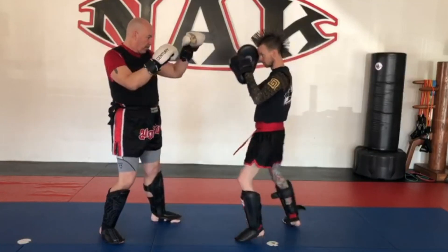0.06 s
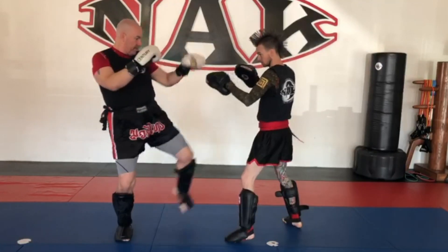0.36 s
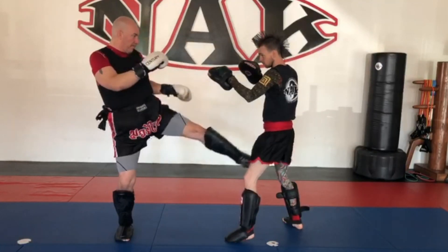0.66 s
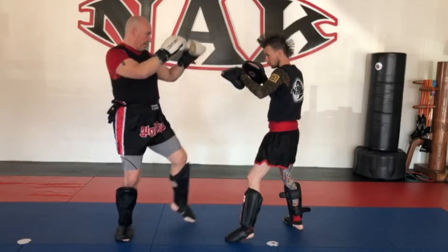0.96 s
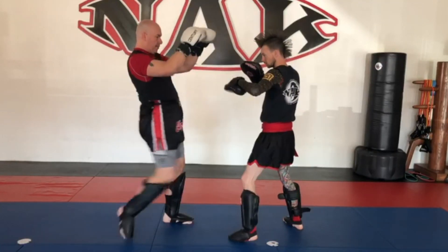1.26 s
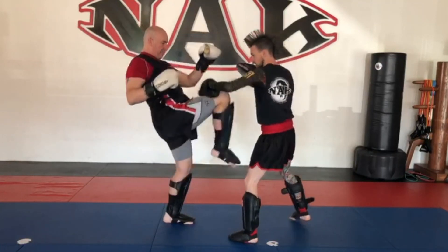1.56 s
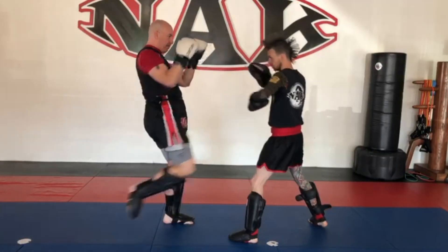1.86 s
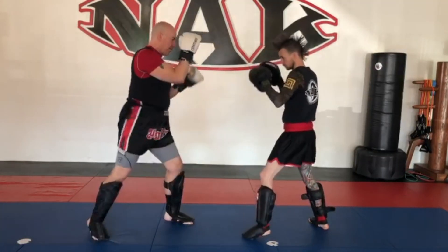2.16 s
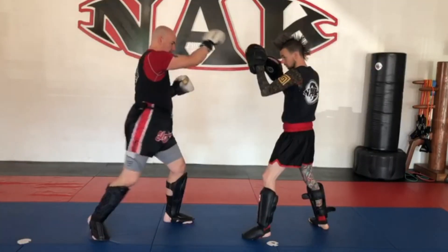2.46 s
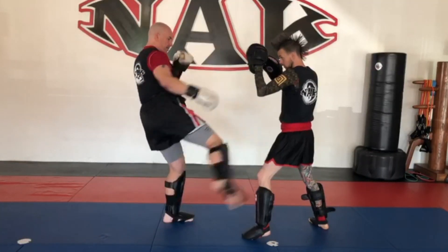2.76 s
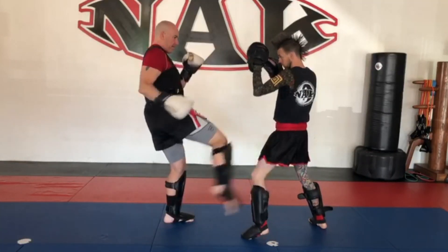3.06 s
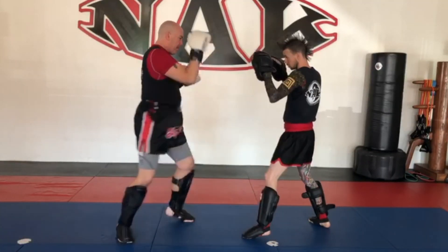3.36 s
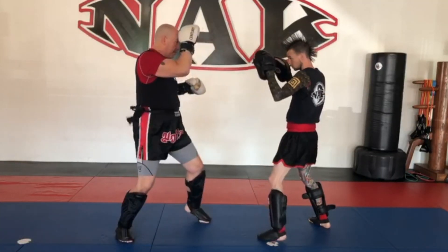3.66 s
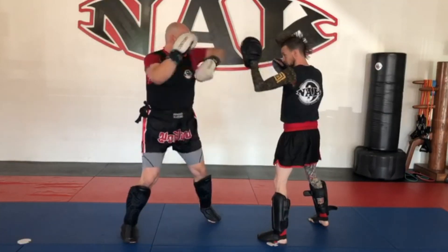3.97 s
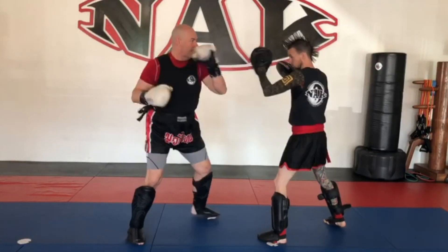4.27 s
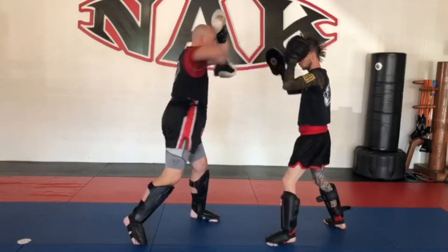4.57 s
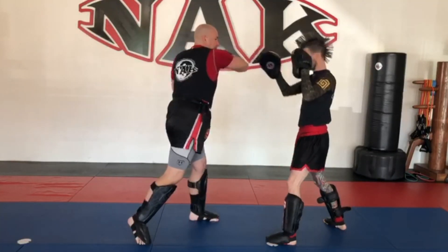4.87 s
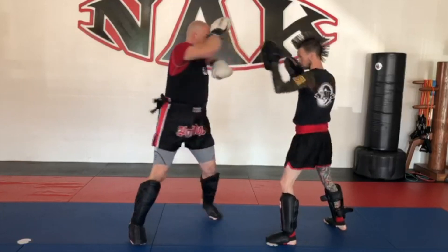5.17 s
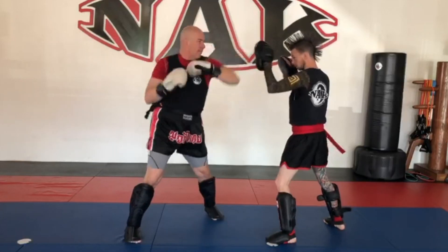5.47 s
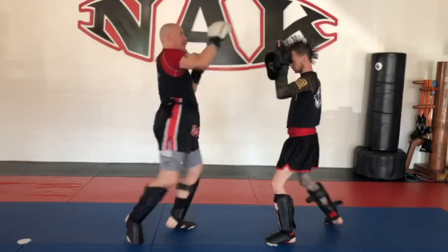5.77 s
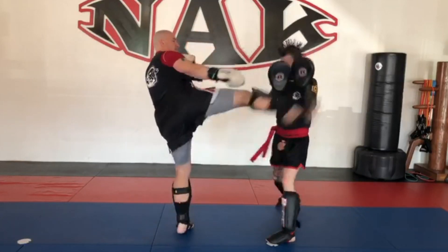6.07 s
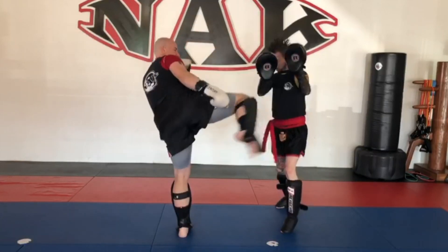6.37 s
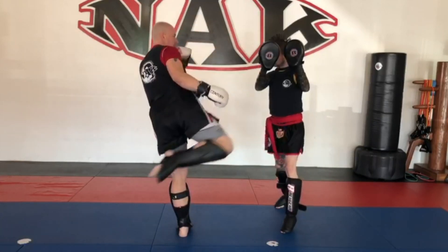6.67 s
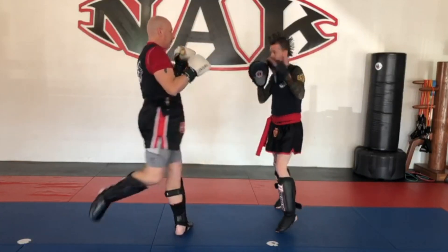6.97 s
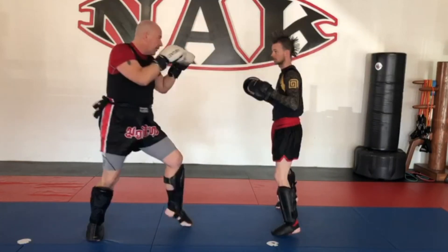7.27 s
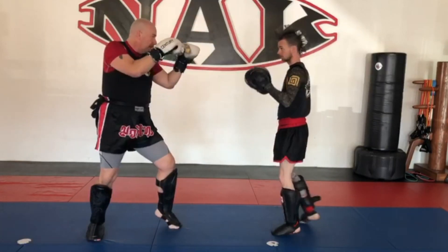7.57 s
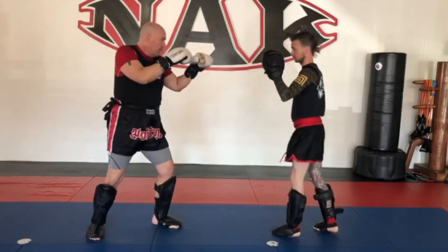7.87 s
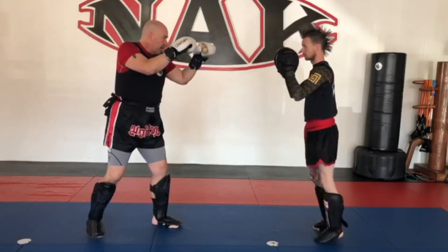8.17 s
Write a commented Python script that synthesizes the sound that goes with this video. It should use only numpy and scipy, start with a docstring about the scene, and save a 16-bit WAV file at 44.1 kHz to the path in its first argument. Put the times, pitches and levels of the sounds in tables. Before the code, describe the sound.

Two kickboxers drill a few metres away in a hard-walled gym, over a faint, steady ventilation rumble. Each blow combines a crack of the pad cover, a pop of air and a padded thud, echoing for under a second. A light, scraping kick brushes a shin guard at 0.6 seconds. A knee smacks sharply into a mitt at 1.5, and a softer kick lands at 2.9. Three closer strikes hit the mitts: a glancing slap at 4.0, a sleeve swish and hard elbow crack at 4.7, and a scraping smack at 5.3. The loudest hit, a full popping kick, comes at 6.1. Between blows, clothes rustle faintly, straps tick and soles slide on foam mats, with soft, thumping steps around 2.0, 3.3 and 7.1. Quiet foot scuffs continue until the end, just after 8 seconds.

```python
"""A hard-walled gym: two kickboxers drill on foam mats, a few metres away.
Kicks, a knee and elbows smack into mitts and shin guards: the cover cracks, trapped air pops,
the padding thuds and the hall answers. Between blows, feet land and slide, straps tick,
a sleeve swishes and clothes rustle over a low ventilation rumble."""
import sys
import numpy as np
from scipy import signal
from scipy.fft import rfft, irfft, next_fast_len
from scipy.io import wavfile

SR = 44100
rng = np.random.default_rng(int(sys.argv[2]) if len(sys.argv) > 2 else 0)


def materialize(psi):
    """Save the field psi as 16-bit PCM at rate SR to the path in sys.argv[1].

    A 1-D psi becomes a single channel; in a 2-D psi each row is a channel.
    """
    bounded = np.clip(np.atleast_2d(psi).T, -1, 1)
    quanta = np.round(bounded * 32767).astype(np.int16)
    wavfile.write(sys.argv[1], SR, quanta)


N = 362925
TIME_S = np.arange(N) / SR


def from_db(db):
    return 10 ** (np.asarray(db) / 20)


def unit_rms(x):
    return x / np.sqrt(np.mean(x ** 2) + 1e-20)


def unit_energy(x):
    return x / np.sqrt(np.sum(x ** 2, axis=-1, keepdims=True))


def burst(x, db=0):
    """Scale to the energy of 50 ms at rms level db."""
    return from_db(db) * x * np.sqrt(.05 * SR / (np.sum(x ** 2) + 1e-20))


def at_hz(table, hz):
    """Table columns, interpolated over log frequency."""
    freqs, *columns = np.transpose(table)
    return [np.interp(np.log(hz), np.log(freqs), column) for column in columns]


def butter(x, kind, hz, order=2):
    sos = signal.butter(order, np.clip(hz, 10, .45 * SR), kind, fs=SR, output="sos")
    return signal.sosfilt(sos, x + 1e-18)


def resonate(x, hz, q):
    return signal.lfilter(*signal.iirpeak(hz, q, fs=SR), x + 1e-18)


def delayed(x, delay_s):
    return np.pad(x, (round(delay_s * SR), 0))[:len(x)]


def add(track, time_s, sound):
    start = round(time_s * SR)
    track[start:start + len(sound)] += sound[:N - start]


def swell(centre_s, sigma_s):
    return np.exp(-.5 * ((TIME_S - centre_s) / sigma_s) ** 2)


def flutter(rate_hz, depth_db):
    """Randomly wandering gain."""
    return from_db(depth_db * unit_rms(butter(rng.standard_normal(N), "low", rate_hz)))


def coloured_noise(spectrum):
    size = next_fast_len(N, real=True)
    gain = from_db(at_hz(spectrum, np.fft.rfftfreq(size, 1 / SR) + 1)[0])
    return unit_rms(irfft(rfft(rng.standard_normal(size)) * gain, size)[:N])


def noise_bands(count, size):
    """Half-octave noise as (centre [Hz], width [Hz], signals); adjacent bands are independent."""
    edges_hz = 35 * 2 ** (np.arange(18) / 2)
    white = rng.standard_normal((2, count, size + SR // 8))
    for k, (low, high) in enumerate(zip(edges_hz, edges_hz[1:])):
        yield np.sqrt(low * high), high - low, butter(white[k % 2], "band", [low, high])[:, -size:]


def crackle(decay_s, grain_db):
    """Surfaces meet patch by patch: a dying burst of uneven micro-clicks."""
    t = TIME_S[:SR // 4]
    grains = rng.standard_normal(len(t))
    unevenness = from_db(grain_db * np.clip(rng.standard_normal(len(t)), -2, 2))
    return burst(grains * unevenness * np.exp(-t / decay_s))


# Ventilation spectrum: (frequency [Hz], relative density [dB])
VENTILATION_SPECTRUM = [(15, -63), (25, -22.5), (44, -5.5), (127, -10), (208, -12), (249, -12.5),
                        (291, -17), (323, -15.5), (527, -21.5), (584, -21.5), (797, -25.5), (3660, -32.5),
                        (4060, -33.5), (12000, -41), (15600, -70.5), (22000, -120)]


def ventilation(level_db=-59):
    """Moving air: a steady low rumble."""
    return from_db(level_db) * coloured_noise(VENTILATION_SPECTRUM)


# Diffuse field: (frequency [Hz], scatter [dB], tail [dB], tail T60 [s])
HALL_BANDS = [(60, -10, -8.5, 0.86), (129, 3.5, -1, 1), (253, -2.5, -2.5, .68), (490, -2, -3.5, 0.73),
              (980, -4.5, -5.5, 0.83), (2040, -5, -7.5, 0.91), (4050, -3.5, -6.5, 0.88),
              (7700, -9, -7.5, 0.53), (12000, -5, -8, 0.27)]
# Low room modes: (frequency [Hz], relative level [dB], T60 [s])
HALL_MODES = [(53.7, -6, 0.97), (78.2, -1, 0.78), (125, -10.5, 0.48)]


def hall(spots, scatter_t60_s=.13, far_wall_s=.102, far_wall_db=2.5, modes_db=-58):
    """One response per spot: near-wall scatter, a tail that swells off the far wall, low modes."""
    t = TIME_S[:SR]

    def rise(midpoint_s):
        return 1 / (1 + (midpoint_s / (t + 1e-4)) ** 6)

    scatter = unit_energy((rise(.013) + .5 * rise(.00026)) * from_db(-60 * t / scatter_t60_s))
    far_wall = from_db(far_wall_db * np.exp(-((t - far_wall_s) / .016) ** 2))
    build_up = rise(.0079)
    responses = np.zeros((spots, len(t)))
    for hz, width_hz, band in noise_bands(spots, len(t)):
        scatter_db, tail_db, t60_s = at_hz(HALL_BANDS, hz)
        tail = unit_energy(build_up * far_wall * from_db(-60 * t / t60_s))
        envelope = np.hypot(from_db(scatter_db) * scatter, from_db(tail_db) * tail)
        band_energy = np.sum(envelope ** 2) * 2 * width_hz / SR
        responses += unit_energy(band * envelope) * np.sqrt(band_energy)
    for hz, db, t60_s in HALL_MODES:
        responses += from_db(modes_db + db - 60 * t / t60_s) * build_up * np.sin(2 * np.pi * hz * t)
    return responses


# Early reflections: (delay [s], level [dB], low-pass [Hz])
REFLECTIONS = [(.0029, -5.5, 3800), (.0150, -13, 16000), (.0192, -17.5, 17000), (0.014, 2, 59),
               (.0335, -19.5, 4200)]


def reflections(direct):
    """Single bounces off mat, walls and ceiling."""
    return sum(from_db(db) * butter(delayed(direct, delay_s), "low", top_hz, order=1)
               for delay_s, db, top_hz in REFLECTIONS)


# Rustle spectrum: (frequency [Hz], relative density [dB])
CLOTH_SPECTRUM = [(150, 8), (400, 4.5), (1000, -3.5), (2500, -7), (6000, -11), (12000, -15.5)]


def clothes(rest_db=-73, follow_db=-8.5, sigma_s=.16):
    """Cloth rustles faintly throughout and swells around each step, swish and slide."""
    moves = [(time_s, scuff_db) for time_s, _, _, scuff_db, _ in STEPS_AND_SLEEVE]
    moves += [(time_s, hiss_db) for time_s, _, hiss_db, _ in SOLE_SLIDES]
    stir = np.max([from_db(db + follow_db) * swell(time_s, sigma_s) for time_s, db in moves], axis=0)
    rustle = unit_rms(butter(coloured_noise(CLOTH_SPECTRUM), "high", 130))
    return np.hypot(from_db(rest_db), stir) * rustle * flutter(rate_hz=25, depth_db=2.2)


# Sole hiss spectrum: (frequency [Hz], relative density [dB])
SOLE_SPECTRUM = [(300, -11), (1200, -4), (3000, -1.5), (5500, -3), (9000, -6), (12000, -3.5)]
# Slides and pivots: (centre time [s], sigma [s], hiss [dB], rub [dB])
SOLE_SLIDES = [ (0.0, 0.047, -58.5, -54.5), (0.133, 0.033, -72, -60.5), (0.246, 0.011, -51.5, -73),
               (1.181, .034, -57.5, -59), (2.075, 0.068, -54, -58.5), (2.549, 0.027, -68, -57),
               (3.601, 0.037, -49.5, -59.5), (4.034, 0.037, -51, -54), (5.192, 0.064, -58, -65),
               (5.827, .02, -63.5, -61), (7.004, 0.022, -58, -64.5), (7.533, 0.056, -51, -64),
               (7.948, 0.031, -65.5, -62), (8.061, 0.016, -54.5, -58.5)]


def slides():
    """Soles drag on the mat: grainy hiss over a duller rub."""
    hiss = coloured_noise(SOLE_SPECTRUM) * flutter(rate_hz=150, depth_db=2.9)
    rub = unit_rms(resonate(rng.standard_normal(N), hz=560, q=1))
    return sum(swell(time_s, sigma_s) * (from_db(hiss_db) * hiss + from_db(rub_db) * rub)
               for time_s, sigma_s, hiss_db, rub_db in SOLE_SLIDES)


# Strap and glove ticks: (time [s], level [dB])
STRAP_TICKS = [(1.131, -62.5), (1.1653, -60.5), (1.179, -64), (2.41, -64.5), (3.1433, -62)]


def straps():
    """Straps and glove leather tick in short, bright crackles."""
    track = np.zeros(N)
    for time_s, db in STRAP_TICKS:
        tick = butter(crackle(decay_s=.0015, grain_db=4), "band", [2200, 10000], order=1)
        add(track, time_s, burst(tick, db))
    return track


# Landings on the mat, plus one bright sleeve swish just before the elbow strike (4.63 s):
# (time [s], weight [dB], slap [Hz], scuff [dB], scuff decay [s])
STEPS_AND_SLEEVE = [ (0.232, -58, 895, -59.5, .005), (1.017, -56, 393, -60, 0.027),
                    (1.2863, -61, 1600, -62, 0.015), (2.0086, -42, 800, -65.5, 0.022),
                    (3.3098, -43, 840, -56, 0.018), (3.518, -57, 468, -58.5, 0.011),
                    (4.318, -58.5, 400, -54.5, 0.018), (4.4783, -67, 555, -52, .022),
                    (4.631, -51.5, 1970, -52.5, 0.039), (5.7455, -50.5, 460, -50, 0.0062),
                    (6.024, -55.5, 700, -48.5, .035), (7.0756, -40, 572, -54.5, 0.055)]


def steps_and_sleeve(heavy_hz=198, heavy_db=-42, rise_oct_per_db=.05):
    """Slap, scuff, then thump: a foot landing on foam or, with a bright slap, the sleeve swish."""
    track, click = np.zeros(N), signal.unit_impulse(SR // 4)
    for time_s, weight_db, slap_hz, scuff_db, decay_s in STEPS_AND_SLEEVE:
        slap_db = (weight_db + scuff_db) / 2 + 3
        slap = resonate(crackle(.19 * decay_s, grain_db=.99), slap_hz, q=.49)
        slap = butter(slap, "low", 3 * slap_hz)
        scuff = butter(crackle(decay_s, grain_db=12), "high", 780, order=1)
        scuff = butter(scuff, "low", 8500)
        add(track, time_s, burst(slap, slap_db) + burst(scuff, scuff_db))
        # A light step sinks less into the foam, so it thumps higher.
        thump_hz = heavy_hz * 2 ** (rise_oct_per_db * (heavy_db - weight_db))
        thump = butter(resonate(click, thump_hz, q=2), "low", 2.1 * thump_hz)
        thump = butter(thump, "high", .5 * thump_hz)
        add(track, time_s + .004, burst(thump, weight_db))
    return track


def body_thud(impact, depth_db, base_db=-23.5, db_per_depth_db=1.29):
    """The blow shoves limb and body, harder the deeper it sinks: a slow pulse of air."""
    shove = butter(resonate(impact, hz=70, q=.48), "low", 100, order=3)
    return burst(shove, base_db + db_per_depth_db * depth_db)


def padding_thump(impact, hz, depth_db, base_db=-20.5):
    """The padding gives way: one low, damped resonance."""
    return burst(butter(resonate(impact, hz, q=1), "low", 2.7 * hz), base_db + depth_db)


def air_pop(contact, hz, air_db, base_db=-20.5):
    """Air trapped at the contact pops in a broad resonance."""
    pop = butter(resonate(contact, hz, q=.92), "high", .44 * hz)
    return burst(butter(pop, "low", 3.7 * hz), base_db + air_db)


def cover_crack(contact, bottom_hz, decay_s, snap_db, base_db=-24, scrape_oct_per_s=42):
    """The cover cracks; a glancing blow scrapes longer and opens the treble."""
    top_hz = 3880 * 2 ** (scrape_oct_per_s * decay_s)
    crack = butter(butter(contact, "high", bottom_hz), "low", top_hz, order=1)
    return burst(crack, base_db + snap_db)


def cover_ring(x, hz, boost_db):
    """The taut cover rings for a few cycles."""
    return x + (from_db(boost_db) - 1) * resonate(x, hz, q=3.4)


def strike(landing_s, touch_db, decay_s, snap_db, bottom_hz, air_db, pop_hz,
           depth_db, padding_hz, ring_hz, ring_db, glancing_loss_db_per_s=340.5):
    """One blow touches, then lands in full. Returns (direct sound, feed to the hall)."""
    click = burst(signal.unit_impulse(SR // 4))
    touch_gain = from_db(touch_db)

    def contact(grit):
        touch = click + grit * crackle(decay_s, grain_db=1)
        landing = click + grit * crackle(decay_s, grain_db=1)
        return touch_gain * touch + delayed(landing, landing_s)

    lows = padding_thump(delayed(click, 1.616 * landing_s), padding_hz, depth_db)
    lows += body_thud(delayed(click, landing_s + .0054), depth_db)
    # The crack beams forward; glancing blows lose level on the direct path.
    crack = from_db(1.5) * cover_crack(contact(grit=1.1), bottom_hz, decay_s, snap_db)
    pop = air_pop(contact(grit=3.9), pop_hz, air_db)
    direct_gain = from_db(3 - glancing_loss_db_per_s * decay_s)
    direct = direct_gain * (cover_ring(crack + pop, ring_hz, ring_db) + lows)
    # Summed over all directions, the micro-clicks blend into one pulse.
    pulse = delayed(click, landing_s / (1 + touch_gain ** 2))
    smack = cover_crack(pulse, bottom_hz, decay_s, snap_db) - air_pop(pulse, pop_hz, air_db)
    return direct, cover_ring(smack, ring_hz, ring_db) + lows


# Blows on the pads: (time [s], landing delay [s], touch re landing [dB], crackle decay [s], snap [dB],
# crack high-pass [Hz], trapped air [dB], pop [Hz], depth [dB], padding [Hz], ring [Hz], ring boost [dB])
BLOWS = [ (0.5628, 0.0058, -1, 0.019, -14.5, 1250, -17, 446, -19, 165, 1360, 5.5),
         (1.5169, .0027, 2.5, 0.00026, -3.5, 1750, -6.5, 720, -6, 199, 2500, 5),
         (2.8805, 0.0028, 3, 0.0026, -16.5, 1800, -7, 826, -18.5, 187, 777, 0),
         (4.0379, 0.0038, 1.5, 0.015, -15, 2300, -11.5, 477, -17.5, 186, 1210, 2.5),
         (4.6875, 0.00313, 4, 0.00036, -6, 3200, -10, 736, -5, 178, 1094, 10.5),
         (5.2871, 0.0051, -4, 0.016, -7.5, 2200, -15, 734, -7, 350, 1190, 10),
         (6.1224, 0.0053, -7, 0.0025, -0.5, 1650, 0, 710, -1, 348, 1330, 1.5)]


def blows(responses):
    """Each blow arrives direct, off single surfaces and through the hall from its own spot."""
    direct, diffuse = np.zeros((2, N))
    for (time_s, *blow), response in zip(BLOWS, responses):
        forward, hall_feed = strike(*blow)
        add(direct, time_s, forward)
        add(diffuse, time_s, signal.fftconvolve(hall_feed, response))
    return from_db(-3) * (direct + reflections(direct)) + diffuse


def scene():
    """Ventilation, the fighters' movements and their blows in the hall, mono."""
    mat_response, *pad_responses = hall(spots=len(BLOWS) + 1)
    taps = steps_and_sleeve() + straps()
    friction = slides() + clothes()
    direct = from_db(-4.5) * taps + from_db(-1) * friction
    diffuse = signal.fftconvolve(taps + from_db(-7.5) * friction, mat_response)[:N]
    return (ventilation() + direct + diffuse + blows(pad_responses))[None]


def record(dry, cutoff_hz=11800):
    """Microphone: bass cut, soft-clipped peaks, steep treble cut."""
    band_limited = butter(butter(dry, "high", 48, order=8), "low", 11500, order=4)
    rounded = 1.181 * np.tanh(band_limited / 1.44)
    return signal.sosfilt(signal.ellip(10, .3, 70, cutoff_hz, fs=SR, output="sos"), rounded)


dry = scene()
out = record(dry)
materialize(out)
```